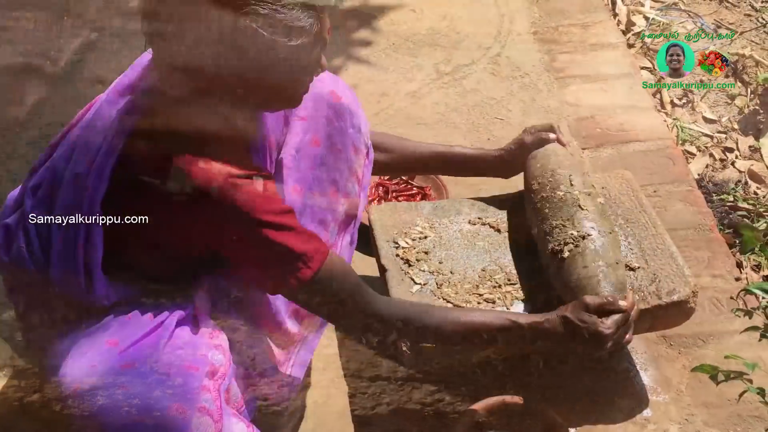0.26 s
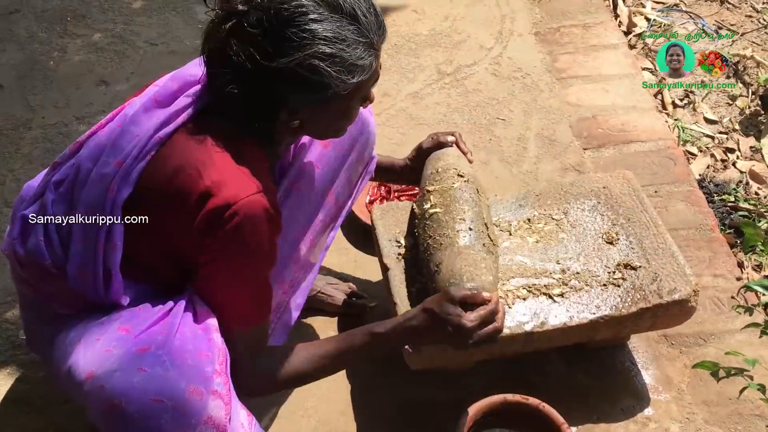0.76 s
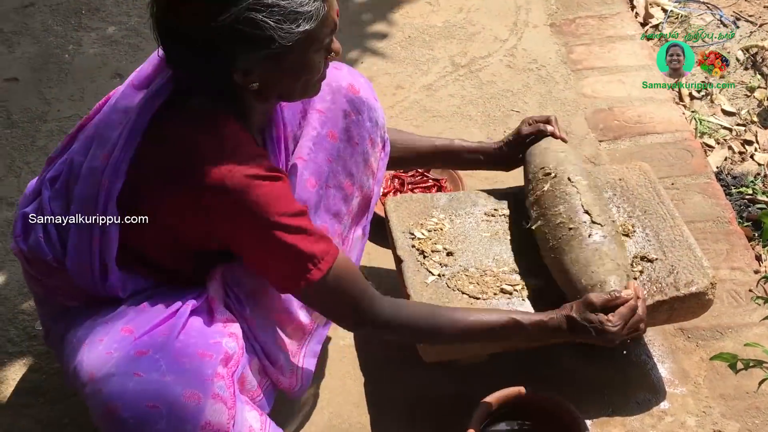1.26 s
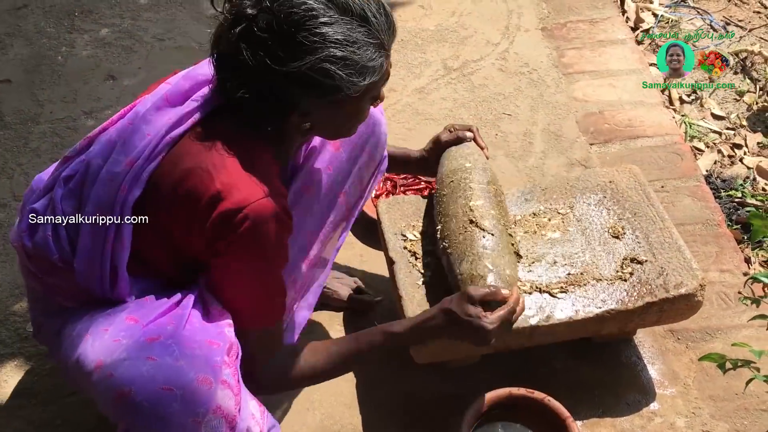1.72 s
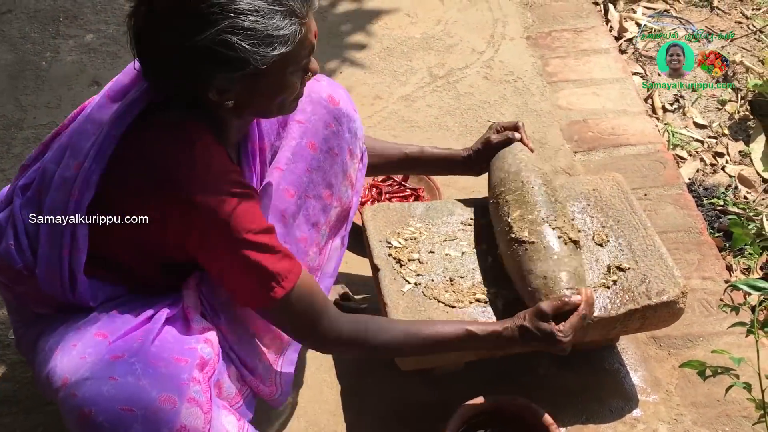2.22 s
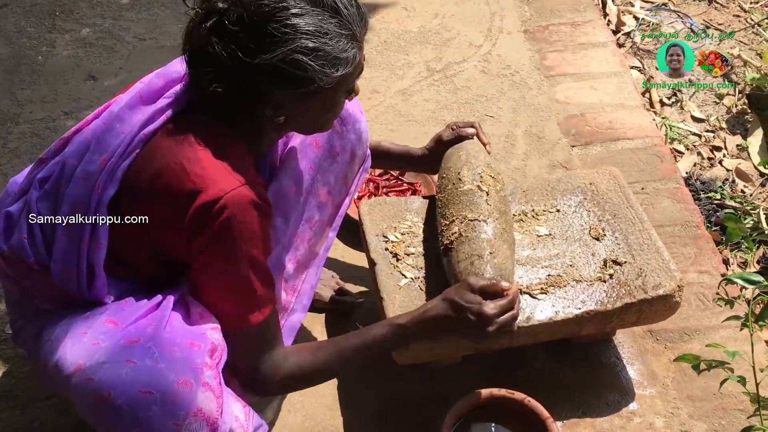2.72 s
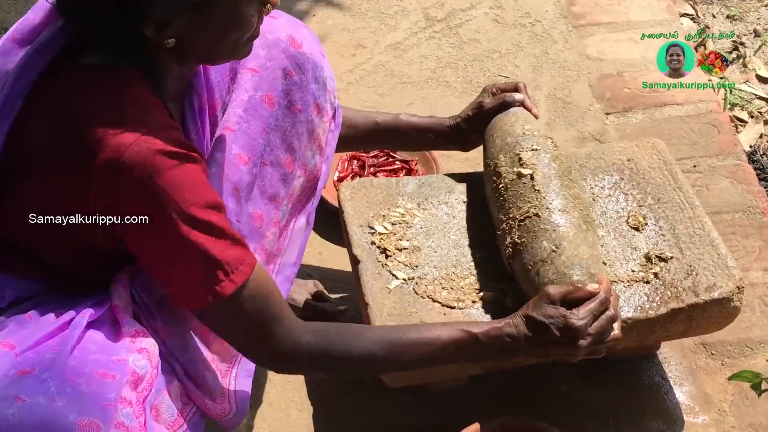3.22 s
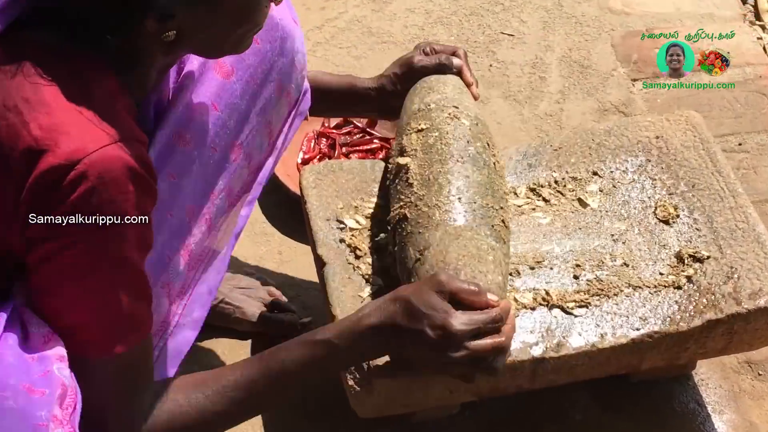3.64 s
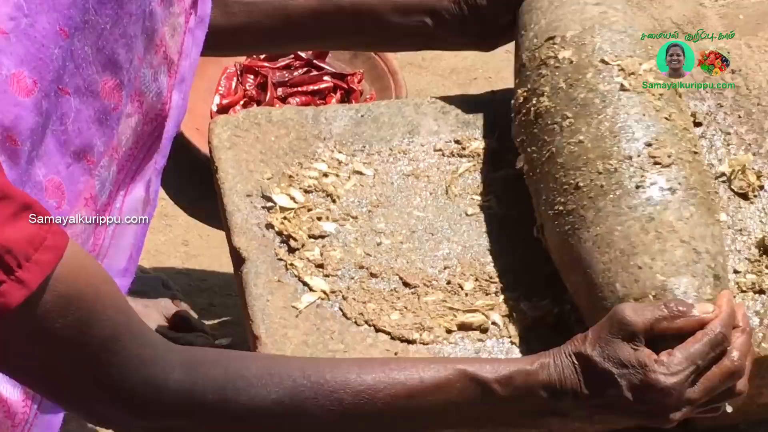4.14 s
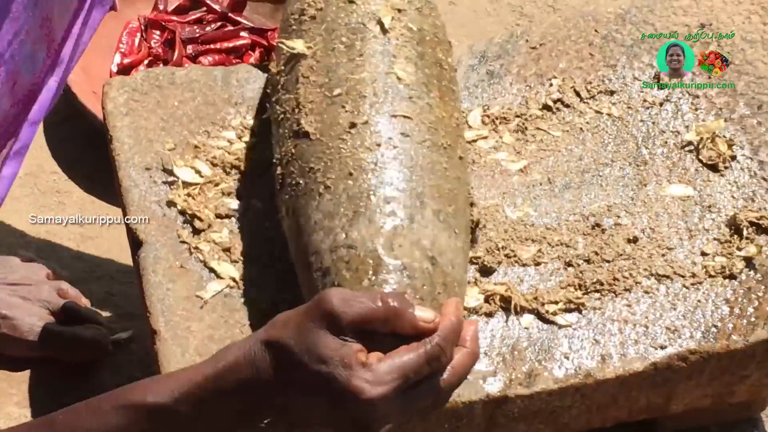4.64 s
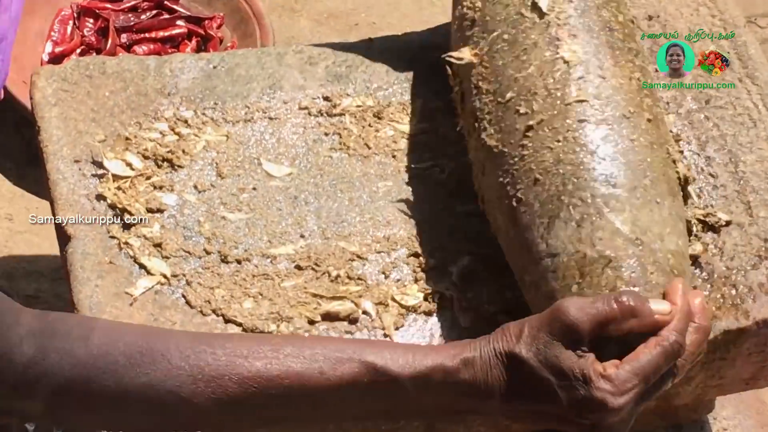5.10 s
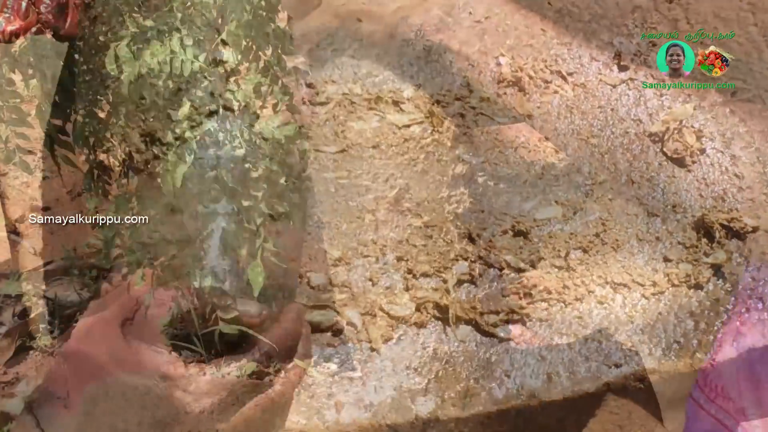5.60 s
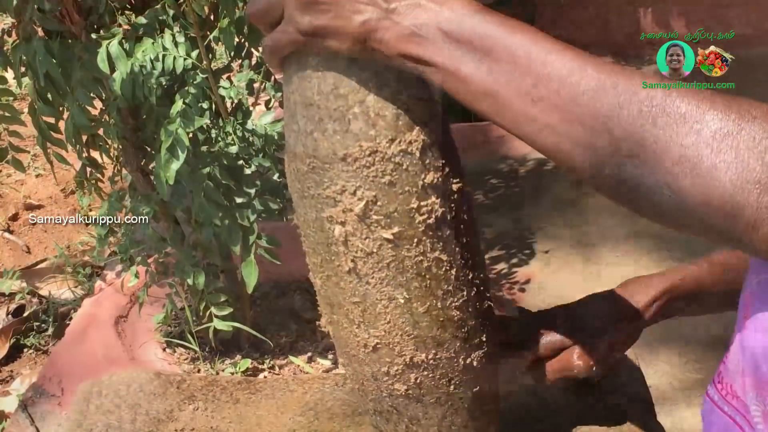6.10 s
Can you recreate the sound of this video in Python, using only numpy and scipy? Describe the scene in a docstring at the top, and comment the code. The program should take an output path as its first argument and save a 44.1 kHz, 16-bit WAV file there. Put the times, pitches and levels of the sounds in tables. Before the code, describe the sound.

From 0 s, close to the microphone, a heavy stone roller grinds wet spice paste on a stone slab in a quiet yard with faint low background noise. Strokes out and back last about half a second each, swelling with deep rumble and fine, wet, fizzing crackle, and thinning briefly at each turn. Dull knocks fall in pitch as the roller drops off lumps; small husks tick. From about 1.2 to 3.4 s a bird whistles short double-arched chirps, several times a second, rising in pitch at first, with slight echo. Fainter two-note glides answer from farther off until about 3.7 s. Around 2.9 to 3.2 s, hard seeds snap in a bright, rapid cluster. Grinding continues with more knocks; distant peeps come near 4.2 s, and softer chirps return from 4.3 to 5.6 s with thin high bird notes. At 5.7 s everything stops dead.

```python
"""A stone roller is pushed to and fro, close by, over wet spice paste on a stone slab in a yard.
From the start the slab rumbles (shaped noise), the paste crackles (clicks and tiny grains), and the
roller knocks over lumps (falling damped tones) and cracks a few seeds (bright ticks, sharp snaps).
From just after 1 s a bird whistles double-arched chirps in two bouts, about 1.2-3.4 s and 4.3-5.6 s,
while others call farther off in short glides; the sound stops dead after 5.7 s."""
import sys
import numpy as np
from scipy import signal
from scipy.fft import rfft, irfft
from scipy.io import wavfile
from scipy.ndimage import uniform_filter1d

SR = 44100
rng = np.random.default_rng(int(sys.argv[2]) if len(sys.argv) > 2 else 0)


def waveform_to_disk(signal):
    """Save audio, clipped to [-1, 1], as 16-bit WAV at the path in sys.argv[1]."""
    frames = np.transpose(np.atleast_2d(signal))
    scaled = np.clip(frames, -1, 1) * 32767
    samples = np.round(scaled).astype(np.int16)
    wavfile.write(sys.argv[1], SR, samples)


N = 280464
TIME = np.arange(N) / SR
GRAIN_TIME = np.arange(SR // 25) / SR

# a seed or husk cracks under the roller: start_s, tick_peak_db, hardness (0-1)
SEED_CRACKS = [(0.123, -39, 0), (0.4443, -32, 0), (0.9027, -34.5, 0), (1.0798, -33.5, 0), (1.3356, -35, 0),
               (1.475, -30.5, 0.57), (1.629, -43, 0), (1.984, -44, 0.07), (2.0649, -29, 0.3),
               (2.566, -31.5, 0.02), (2.9329, -32.5, 0.93), (2.9892, -21.5, 0.94), (3.019, -21, 0.93),
               (3.0386, -23.5, 0.94), (3.0563, -30.5, 0.95), (3.0865, -29.5, 0.95), (3.1086, -29.5, 0.92),
               (3.1779, -38, 0.93), (3.3146, -38, 0.81), (4.5088, -37.5, 0.3), (4.7212, -41, .3),
               (4.7368, -38.5, .2), (4.9414, -31.5, 0.77), (5.5248, -33, 0.24), (5.5662, -30.5, 0.47)]


def amp(db):
    """Amplitude ratio of a level in dB."""
    return 10 ** (np.asarray(db) / 20)


def evened(x):
    """The signal brought to rms 1."""
    return x / np.sqrt(np.mean(x ** 2) + 1e-20)


def read(points, hz):
    """Spectrum level in dB, interpolated along log frequency."""
    f, value = np.transpose(points)
    return np.interp(np.log(hz + 1), np.log(f + 1), value)


def coloured(x, points):
    """Causal minimum-phase filter with the given spectrum."""
    hz = abs(np.fft.fftfreq(4096, 1 / SR))
    log_gain = np.log(amp(read(points, hz)))
    taps = np.fft.ifft(np.exp(np.conj(signal.hilbert(log_gain)))).real
    return signal.oaconvolve(x, taps[:len(taps) // 2])[:len(x)]


def noise(points):
    """Noise of rms 1 with the given spectrum."""
    gain = amp(read(points, np.fft.rfftfreq(N, 1 / SR)))
    return evened(irfft(rfft(rng.standard_normal(N)) * gain, N))


def drift(rate_hz):
    """Slow random motion of rms 1."""
    shape = np.exp(-(np.fft.rfftfreq(N, 1 / SR) / rate_hz) ** 2)
    return evened(irfft(rfft(rng.standard_normal(N)) * shape, N))


def clicks(per_s, spread_db):
    """Random impulses of either sign, most small and a few large."""
    sizes = amp(spread_db * np.minimum(rng.exponential(1, N), 4.5))
    struck = rng.random(N) < per_s / SR
    return sizes * rng.choice([-1, 1], N) * struck


def add(mix, s, sound):
    """Lay a sound into the mix at a time in seconds."""
    part = mix[max(round(s * SR), 0):][:len(sound)]
    part += sound[:len(part)]


def strokes():
    """Gains of crackle, rumble and small knocks: each follows the roller's speed and swells on the heap."""
    # strokes, out and back by turns; heap_s is when the roller crosses the heap of spice, the levels apply there:
    # start_s, end_s, heap_s, crackle_db, rumble_db, small_knocks_db
    passes = [(-0.15, 0.27, 0.08, -57.5, -51.5, -57.5), (0.35, 0.78, 0.50, -59, -57.5, -74),
              (0.791, 1.226, 1.06, -55, -46.5, -57.5), (1.26, 1.73, 1.58, -57.5, -53.5, -73),
              (1.70, 2.15, 1.937, -55, -46.5, -58.5), (2.17, 2.73, 2.36, -59, -50.5, -71),
              (2.68, 3.23, 2.98, -56.5, -47.5, -60.5), (3.216, 3.65, 3.35, -58.5, -50, -64.5),
              (3.64, 4.113, 3.92, -55.5, -49, -59.5), (4.17, 4.645, 4.38, -57.5, -52, -72.5),
              (4.605, 5.123, 4.94, -57.5, -48, -56.5), (5.114, 5.64, 5.40, -58.5, -53, -67),
              (5.62, 6.10, 5.85, -57, -61, -77)]
    speed_up_s, slow_down_s = 0.096, 0.12  # the roller gathers speed, glides, and slows for the turn
    heap_half_s, heap_crackle_db = 0.18, 2  # time scale either side of the heap; extra crackle on it
    bare_rumble_db, bare_lumps_db = -15, -20.5  # away from the heap, against the values on it
    turn_crackle_db, turn_rumble_db = -67.5, -56  # what is left while the roller turns round
    crackle, rumble, lumps = np.zeros((3, N))
    for start, end, heap_s, crackle_db, rumble_db, lumps_db in passes:
        ramp = np.minimum((TIME - start) / speed_up_s, (end - TIME) / slow_down_s)
        speed = np.sin(np.pi / 2 * np.clip(ramp, 0, 1)) ** 2
        off_heap = 1 - np.exp(-((TIME - heap_s) / heap_half_s) ** 2)
        crackle += speed * amp(crackle_db - heap_crackle_db * off_heap)
        rumble += np.sqrt(speed) * amp(rumble_db + bare_rumble_db * off_heap)
        lumps += np.sqrt(speed) * amp(lumps_db + bare_lumps_db * off_heap ** 2)
    return np.hypot(crackle, amp(turn_crackle_db)), np.hypot(rumble, amp(turn_rumble_db)), lumps


def slab(rolling):
    """The rolling stone shakes the slab, which also booms at one low resonance."""
    # spectrum of the slab's rumble: frequency_hz, density_db
    rumble_spectrum = [(20, -44), (45, -24.5), (62, -12), (76, 3.5), (105, 4.5), (125, -2), (145, -5.5),
                       (170, -6), (230, -17), (400, -23.5), (900, -62)]
    boom = noise([(30, -39), (44, 1.5), (51, 0.0), (54, 20.0), (61, -24), (85, -58)])
    boom_gain = amp(-54.5) * (rolling / rolling.mean()) ** 0.43  # rises less than the rumble does
    return rolling * noise(rumble_spectrum) + boom_gain * boom


def paste(crackle):
    """Fine grit fizzes, coarser grains tick now and then, and wet ones pop at their own pitches."""
    # spectrum of the wet paste: frequency_hz, density_db
    paste_spectrum = [(500, -9), (1000, -2), (1700, 1.5), (3000, 5.5), (4200, 2), (5000, 0.5), (6200, 6),
                      (7600, 1), (9300, 7), (10500, 4), (12500, 8), (15800, 1.5)]
    fizz = evened(coloured(clicks(per_s=14000, spread_db=2.5), paste_spectrum))
    ticks, pops = np.zeros((2, N))
    for _ in range(16):
        crunch = rng.standard_normal(len(GRAIN_TIME)) * np.exp(-GRAIN_TIME / .0004)
        ticks += signal.oaconvolve(clicks(per_s=16, spread_db=3.1), crunch)[:N]
    for hz in np.linspace(2500, 15000, num=24):
        tone = np.sin(2 * np.pi * hz * rng.uniform(.96, 1.04) * GRAIN_TIME)
        pop = tone * np.exp(-GRAIN_TIME / .0012)
        pops += signal.oaconvolve(clicks(per_s=30, spread_db=3), pop)[:N]
    # the grains come in clumps: a quick and a slower wandering of the level
    clumps = evened(amp(1.7 * drift(rate_hz=60) + 1.0 * drift(rate_hz=12)))
    grit = amp(-1.5) * fizz + amp(-7.5) * evened(coloured(ticks, paste_spectrum))
    wet = amp(-5) * evened(coloured(pops, paste_spectrum))
    return crackle * clumps * (grit + wet)


def plop(start_hz, end_share, glide_s, rise_s, decay_s):
    """A damped blow of peak near 1: a few cycles that fall quickly in pitch."""
    t = GRAIN_TIME
    hz = start_hz * (end_share + (1 - end_share) * np.exp(-t / glide_s))
    shape = (1 - np.exp(-(t / rise_s) ** 2)) * np.exp(-t / decay_s)
    return shape / shape.max() * np.sin(2 * np.pi * np.cumsum(hz) / SR)


def knocks(lumps):
    """Dull falling knocks of roller on slab: large ones off lumps and broken seeds, a patter of small ones."""
    # the roller drops off a large lump: start_s, knock_level_db, nominal_pitch_hz (sets where the fall begins)
    lump_drops = [(0.003, -37, 530), (0.015, -35, 285), (0.101, -48, 307), (0.185, -47, 352),
                  (0.736, -49.5, 288), (0.964, -48, 443), (0.987, -48, 291), (1.12, -42.5, 340),
                  (1.293, -51.5, 398), (2.066, -38, 327), (2.355, -34.5, 479), (2.38, -41, 285),
                  (2.425, -46, 668), (2.793, -44.5, 294), (2.825, -38.5, 305), (2.967, -43.5, 282),
                  (3.129, -43, 299), (3.224, -43.5, 380), (3.239, -46, 288), (3.355, -42.5, 368),
                  (3.797, -37.5, 420), (3.897, -44.5, 517), (3.901, -38.5, 408), (3.947, -37, 670),
                  (4.072, -47, 425), (4.326, -43.5, 303), (4.787, -41, 290), (4.889, -46.5, 760),
                  (4.936, -39, 298), (4.961, -44, 354), (4.973, -39.5, 390), (5.001, -45, 444),
                  (5.315, -42, 606), (5.326, -40.5, 387), (5.398, -48, 340), (5.427, -46.5, 660)]
    # the roller falls through a hard seed onto the slab; soft_drop_db is the change for the softest husk
    drop_db, soft_drop_db, drop_hz, drop_delay_s = -37.5, -60, 285, 0.00092
    # the slab's thud against a knock of this pitch; higher knocks thud less
    thud_db, thud_hz, thud_db_per_octave = -6, 300, -7
    large, small = np.zeros(N), np.zeros(N)
    seed_drops = [(s + drop_delay_s, drop_db + soft_drop_db * (1 - hardness), drop_hz)
                  for s, _, hardness in SEED_CRACKS]
    for s, db, hz in lump_drops + seed_drops:
        end_share = .15 * rng.uniform(.6, 1.6)
        knock = plop(56 * np.sqrt(hz), end_share, glide_s=0.0026, rise_s=0.0013, decay_s=0.0064)
        add(large, s, amp(db) * knock)
        thud = plop(315 * rng.uniform(.85, 1.15), end_share=.85, glide_s=.006, rise_s=.003, decay_s=.006)
        thud_level_db = db + thud_db + thud_db_per_octave * np.log2(hz / thud_hz)
        add(large, s + 0.0034, amp(thud_level_db) * thud)
    for hz in np.geomspace(330, 1200, num=10):
        grain = plop(hz, end_share=.3, glide_s=.004, rise_s=.0015, decay_s=.0035)
        small += signal.oaconvolve(clicks(per_s=15, spread_db=5.0), grain)[:N]
    return large + lumps * evened(small)


def cracks():
    """Each seed strains for a millisecond, then breaks with a bright tick; hard ones add a sharp lower snap."""
    # spectrum of the bright tick of the husk: frequency_hz, gain_db
    husk_spectrum = [(200, -24), (1000, -1), (2000, -11.5), (3500, -11), (5800, -0.5), (8000, -2),
                     (11000, -6.5), (16000, 1)]
    # spectrum of the lower snap of a hard seed: frequency_hz, gain_db
    snap_spectrum = [(300, -30.5), (1200, -5.5), (2600, 4.5), (3600, 5.5), (5500, -7.5), (8000, -24.5),
                     (16000, -29.5)]
    snap_db, soft_snap_db = -1, -15  # hardest seed's snap against its tick; change for the softest husk
    strain_s, break_s, crumble_s = .0013, .00025, .0011
    out, t = np.zeros(N), GRAIN_TIME
    shape = np.exp(-abs(t - strain_s) / break_s) + amp(-14) * np.exp(-t / crumble_s)
    for s, db, hardness in SEED_CRACKS:
        tick = coloured(rng.choice([-1, 1], len(t)) * shape, husk_spectrum)
        splinter = .25 * rng.choice([-1, 1], len(t)) * np.exp(-t / .0007)
        snap = coloured((t == 0) + splinter, snap_spectrum)
        snap_level_db = db + snap_db + soft_snap_db * (1 - hardness)
        add(out, s, amp(db) * tick / abs(tick).max())
        add(out, s + strain_s, amp(snap_level_db) * snap / abs(snap).max())
    return out


def whistle(hz, gain, second_db, third_db, waver):
    """A bird's nearly pure, slightly unsteady tone with two overtones."""
    shake = evened(uniform_filter1d(rng.standard_normal(len(hz)), size=80))
    phase = 2 * np.pi * np.cumsum(hz * (1 + waver * shake)) / SR
    tone = np.sin(phase) + amp(second_db) * np.sin(2 * phase) + amp(third_db) * np.sin(3 * phase)
    return gain * tone * signal.windows.tukey(len(hz), .15)


def chirps():
    """The pitch swings up twice; the other side of the syrinx adds a hoarse higher voice."""
    # double-arched chirps, levels before the yard's colouring (voice against the main tone, 1 dB is added):
    # dip_s, arch_length_s, first_crest_hz, dip_hz, second_crest_hz, level_db, second_voice_db
    chirp_list = [(1.209, 0.057, 1920, 1590, 1913, -39, -24.5), (1.249, .046, 1827, 1760, 1950, -43.5, -24),
                  (1.445, 0.048, 2190, 1708, 2070, -37.5, -29), (1.751, .054, 2193, 1804, 2142, -37.5, -24),
                  (1.987, 0.052, 2310, 1924, 2562, -38, -31.5), (2.212, 0.054, 2360, 2000, 2578, -37, -20),
                  (2.426, .049, 2650, 2030, 2657, -36.5, -25), (2.645, 0.053, 2750, 2107, 2692, -37.5, -20),
                  (2.863, 0.051, 2750, 2153, 2720, -36.5, -29.5),
                  (3.085, 0.045, 2730, 2165, 2710, -35.5, -6.5), (3.353, .052, 2750, 2220, 2685, -36, -19),
                  (4.338, 0.04, 2075, 1793, 2173, -45.5, -9.5),
                  (4.614, 0.038, 2156, 1920, 2220, -43.5, -6.5), (4.86, .038, 2227, 1978, 2255, -41.5, -7),
                  (5.088, 0.04, 2470, 1912, 2355, -43.5, -11), (5.331, 0.039, 2527, 2080, 2627, -41, -22),
                  (5.564, .043, 2325, 2187, 2633, -41.5, -13)]
    # in chirps that dip lower than this the first arch is the softer one
    even_arches_hz, first_db_per_octave = 2080, 16
    out = np.zeros(N)
    for s, arch, first, dip, second, db, voice_db in chirp_list:
        u = np.arange(-1.08 * arch, arch, 1 / SR) / arch  # 0 at the dip, 1 arch length either side
        crest = np.where(u < 0, first, second)
        trough = dip * (1 - 0.0783 * abs(u) - np.maximum(abs(u) - 1, 0) * 0.55)
        swing = abs(np.sin(np.pi * np.minimum(abs(u), 1) ** .9)) ** 1.8
        hz = trough + (crest - trough) * swing
        effort_db = np.interp(u, [-1.08, -.75, -.3, 0, .25, .6, 1], [-20, 1, -2, -3, 3, -3, -20])
        first_db = first_db_per_octave * np.log2(dip / even_arches_hz) * np.clip(-4 * u, 0, 1)
        gain = amp(db + effort_db + first_db)
        main = whistle(hz, gain, second_db=-13, third_db=-14, waver=.011)
        hoarse = whistle(hz * 1.24, gain * amp(voice_db + 1), second_db=-20, third_db=-26, waver=.014)
        add(out, s + u[0] * arch, main + hoarse)
    return out


def other_birds():
    """Short glides and whistles from the trees round the yard, singly or in pairs."""
    # notes by name: length_s, then points of share_of_length (0-1), pitch_hz, relative_level_db
    note_shapes = {"tee": (.040, [(0, 3350, -10), (.25, 3480, 0.5), (.55, 3350, -0.5), (.8, 3000, -1),
                   (1, 2570, -4.5)]), "wit": (.036, [(0, 2550, -15.5), (.3, 3350, 0), (.5, 3850, -5.5),
                   (.75, 4300, -6), (1, 4760, -6)]), "whoop": (.048, [(0, 1050, -5), (.4, 1170, 1.5),
                   (.7, 1450, 6.5), (.85, 1650, 12.5), (1, 1876, 0)]), "pip": (0.05, [(0, 4000, -18),
                   (.2, 4196, 5.5), (.8, 4190, 6), (1, 4660, -31)]), "peep": (.068, [(0, 3670, -1),
                   (.2, 3880, 5.5), (.6, 3810, -1.5), (1, 3730, -37)]), "coo": (.157, [(0, 1250, 1.5),
                   (.25, 1358, 2), (.55, 1450, 6.5), (.8, 1360, 6), (1, 1110, 1)]),
                   "hoo": (0.073, [(0, 1230, 3), (.5, 1297, 13.5), (1, 1220, 2)]),
                   "tsip": (0.029, [(0, 7110, -8.5), (.4, 6330, -4), (1, 4100, -9)]),
                   "swit": (0.018, [(0, 4080, -3), (.6, 6010, -3.5), (1, 7200, -2)])}
    # calls, levels before distance is added: start_s, level_db, note names
    call_list = [(1.136, -47.5, "tee wit"), (1.468, -44.5, "tee wit"), (1.771, -44.5, "tee wit"),
                 (2.060, -44, "tee wit"), (2.372, -44, "tee wit"), (2.686, -45.5, "tee wit"),
                 (3.011, -46.5, "tee wit"), (3.326, -49, "tee wit"), (3.633, -48.5, "tee wit"),
                 (1.268, -56, "whoop"), (3.453, -54, "whoop"), (4.439, -61, "whoop"), (4.227, -46, "pip"),
                 (4.39, -49, "peep"), (5.348, -72, "hoo"), (5.413, -60.5, "coo"), (5.669, -60, "coo"),
                 (4.219, -62, "tsip swit"), (4.579, -52.5, "tsip swit"), (5.035, -55, "swit"),
                 (5.301, -52.5, "tsip swit")]
    note_step_s = .098  # from the first note of a two-note call to the second
    out = np.zeros(N)
    for s, db, notes in call_list:
        for k, note in enumerate(notes.split()):
            length, shape = note_shapes[note]
            share, pitch, level_db = np.transpose(shape)
            u = np.arange(0, length, 1 / SR) / length
            hz = np.interp(u, share, pitch)
            gain = amp(db + np.interp(u, share, level_db))
            call = whistle(hz, gain, second_db=-18, third_db=-24, waver=.003)
            add(out, s + k * note_step_s, call)
    return out


def echoes(x, t60, delay_s):
    """Scattered reflections from walls and trees, of energy 1, dying by 60 dB in t60 seconds."""
    t = np.arange(SR) / SR
    arrivals = rng.choice([-1, 1], SR) * (rng.random(SR) < 1500 / SR)
    tail = arrivals * amp(-60 * t / t60) * (t > delay_s)
    return signal.oaconvolve(x, tail / np.linalg.norm(tail))[:N]


def walls(x):
    """The ground and near walls return each glide a moment later, so that it beats against itself."""
    out = x.copy()
    for delay_s, db in [(.0047, -15), (.016, -12), (.034, -13)]:
        add(out, delay_s, amp(db) * x)
    return out


def birds():
    """The near bird's chirps smear in quick reflections and a longer tail; the others sit farther off."""
    # the chirping bird as heard along the direct path to the microphone: frequency_hz, gain_db
    direct_path = [(1500, -24.5), (1900, -4), (2350, 1.5), (2550, -7.5), (2780, -15), (4200, -19),
                   (5400, -18.5), (6700, -15.5), (11000, -50.5)]
    # the same bird as scattered by the yard: frequency_hz, gain_db
    scattered_path = [(1500, -10), (2100, 5.5), (2650, 5), (3100, -9.5), (4400, 2.5), (5100, -14.5),
                      (5450, 3), (5900, 1.5), (11000, -22.5)]
    near, far = chirps(), other_birds()
    direct = amp(1.5) * walls(coloured(near, direct_path))
    scattered = coloured(near, scattered_path)
    quick = amp(-10) * echoes(scattered, t60=0.091, delay_s=.008)
    tail = amp(-17.0) * echoes(scattered, t60=0.71, delay_s=0.024)
    distant = amp(-3) * far + amp(-7) * echoes(far, t60=.45, delay_s=.003)
    return direct + quick + tail + distant


def yard():
    """The quiet yard behind it all: steady noise, strongest in the low bass."""
    # spectrum of the yard's background: frequency_hz, density_db
    yard_spectrum = [(20, -14), (38, -4), (70, 10), (120, -13), (200, -19), (400, -37.5), (700, -25.5),
                     (900, -22.5), (1400, -26), (2400, -29.5), (5000, -35.5), (16000, -69)]
    return amp(-58.0) * noise(yard_spectrum)


def scene():
    """The grinding stone close by, the birds and the quiet yard."""
    crackle, rumble, lumps = strokes()
    blows, seeds = knocks(lumps), cracks()
    reflected = amp(-4) * echoes(blows + amp(-13.0) * seeds, t60=0.14, delay_s=.004)
    stone = blows + seeds + reflected
    return (stone + slab(rumble) + paste(crackle) + birds() + yard())[None]


def record(dry):
    """The sound stops abruptly; then a low-pass limits the band."""
    stop_s, edge_hz = 5.71, 16000
    band_limit = signal.firwin(401, edge_hz, window=("kaiser", 9), fs=SR)
    return signal.oaconvolve(dry * (TIME < stop_s), band_limit[None], "same")


dry = scene()
out = record(dry)
waveform_to_disk(out)
```